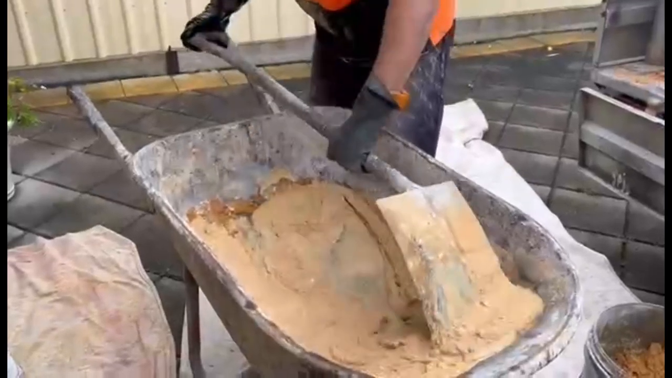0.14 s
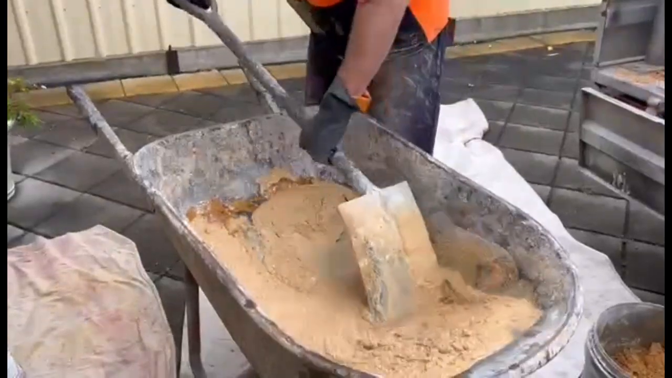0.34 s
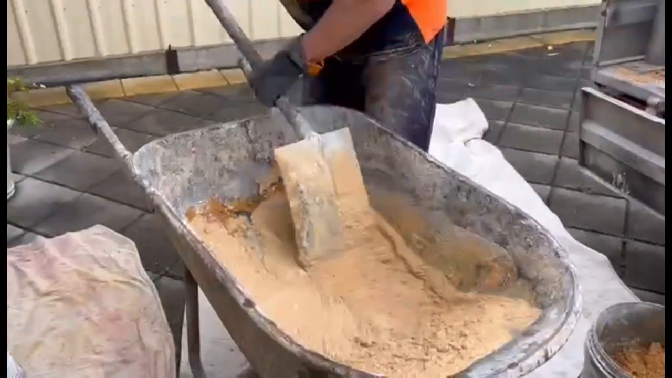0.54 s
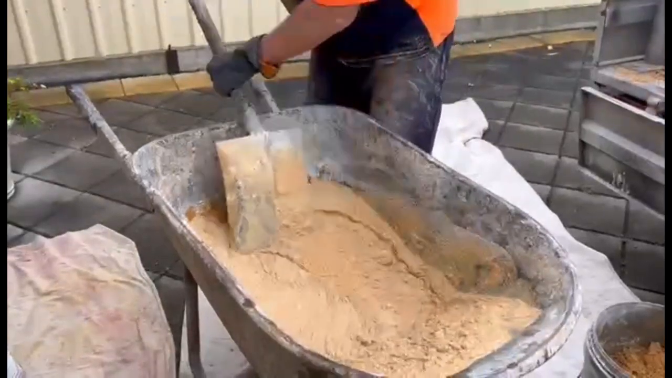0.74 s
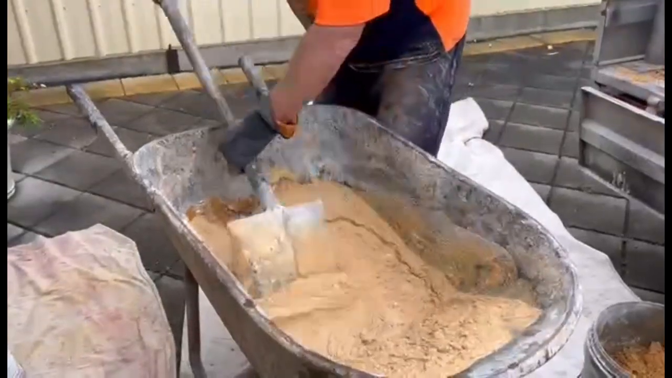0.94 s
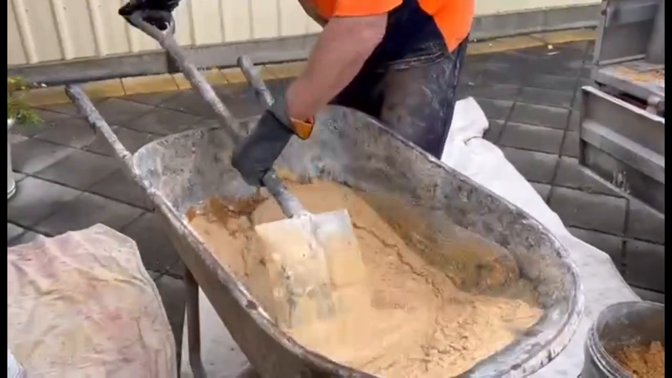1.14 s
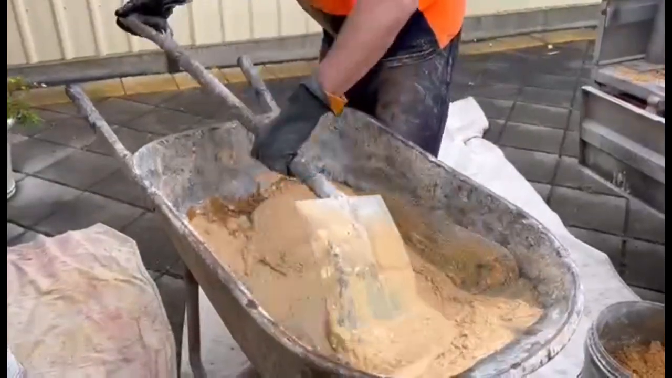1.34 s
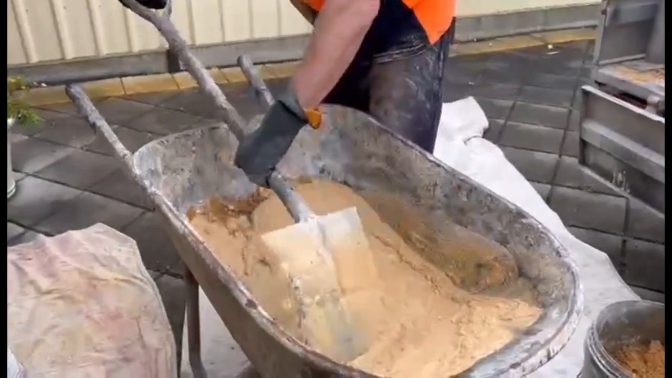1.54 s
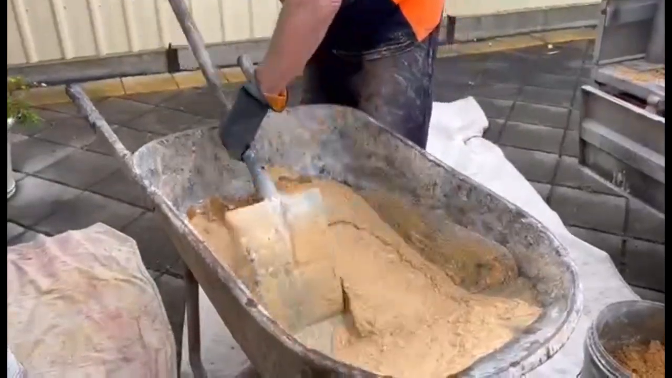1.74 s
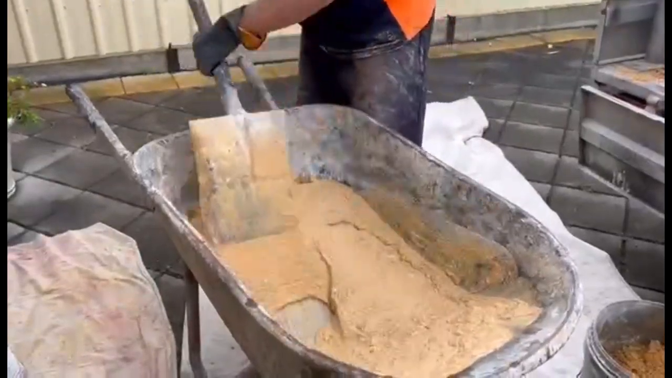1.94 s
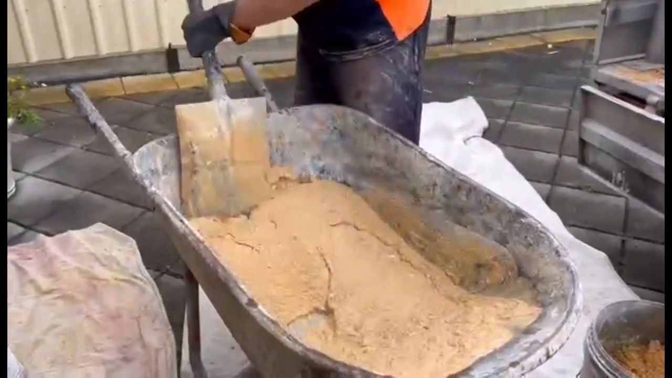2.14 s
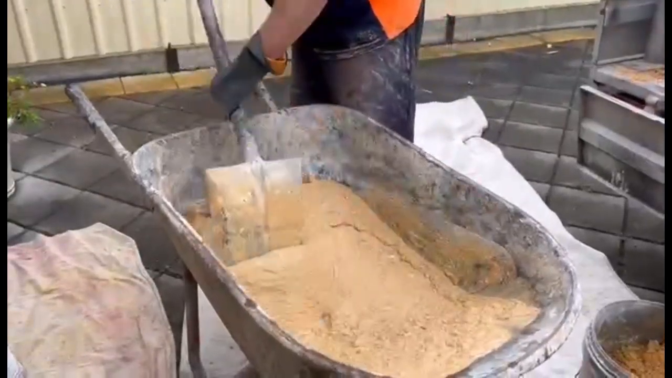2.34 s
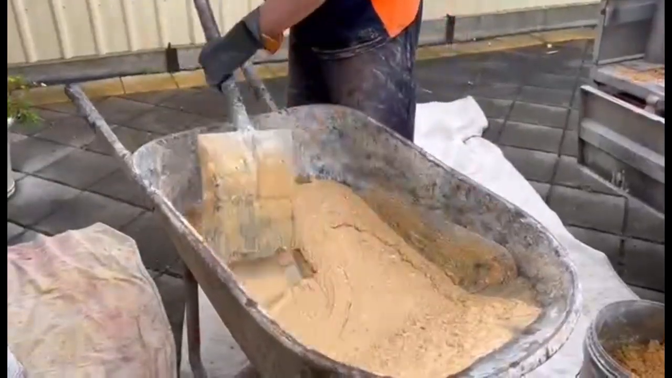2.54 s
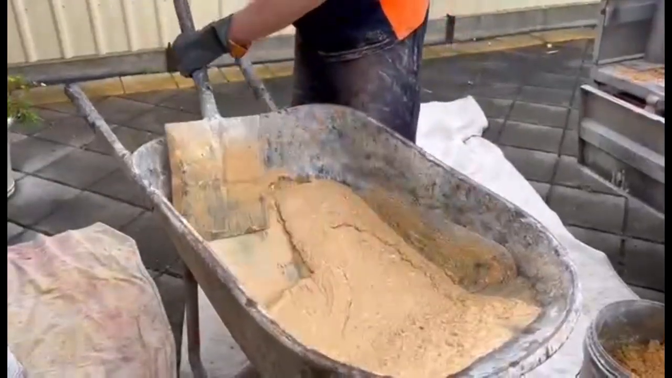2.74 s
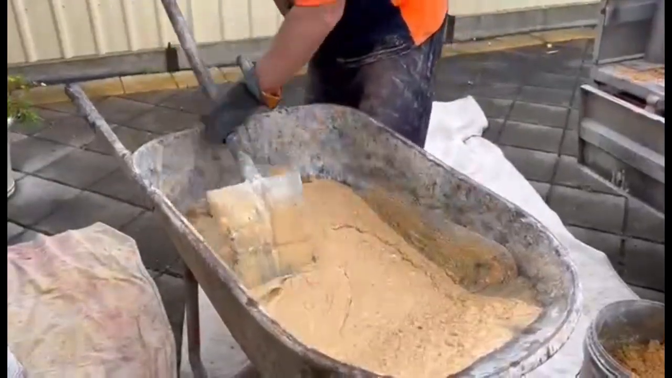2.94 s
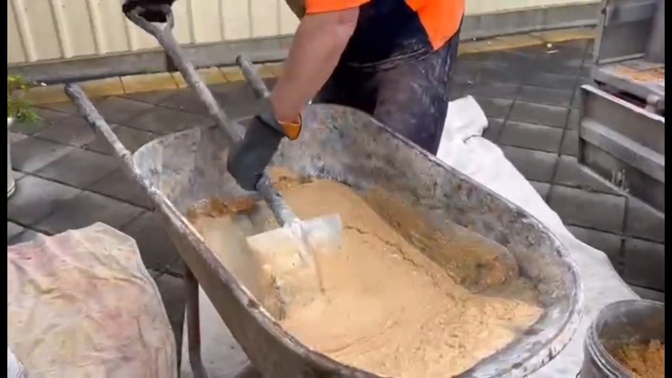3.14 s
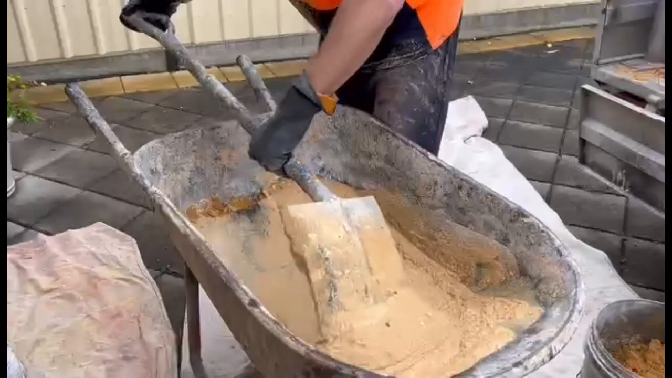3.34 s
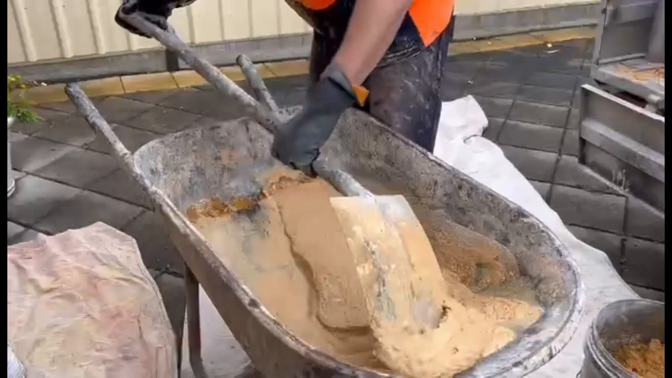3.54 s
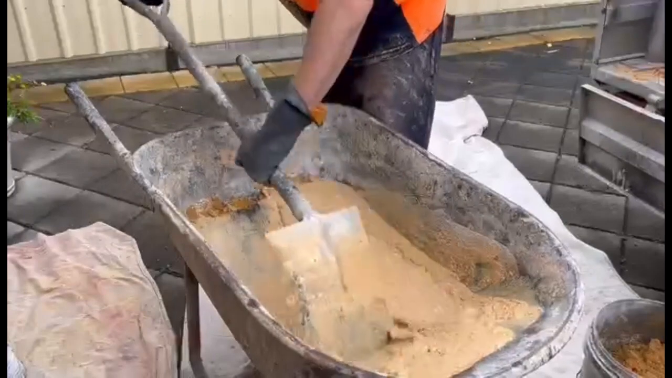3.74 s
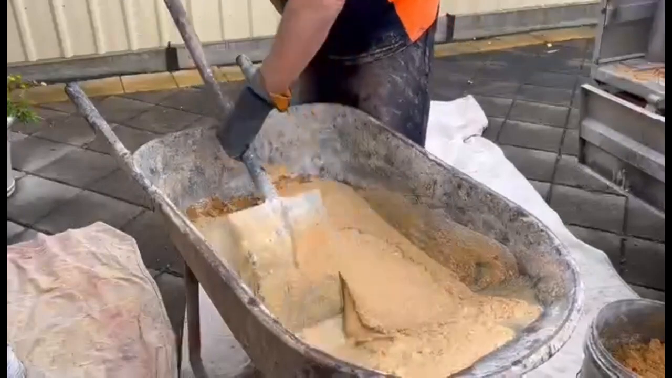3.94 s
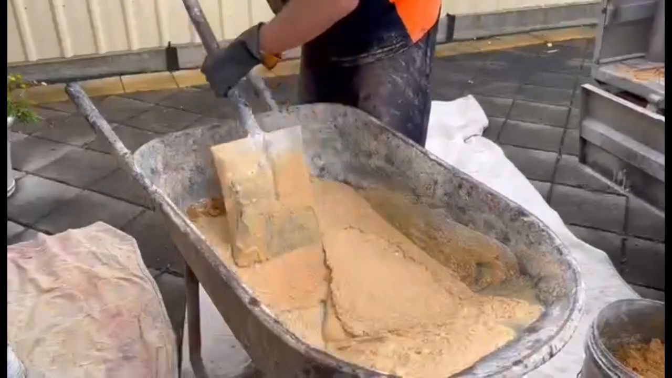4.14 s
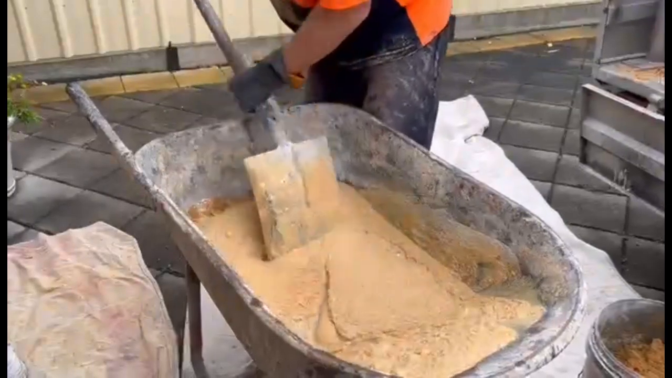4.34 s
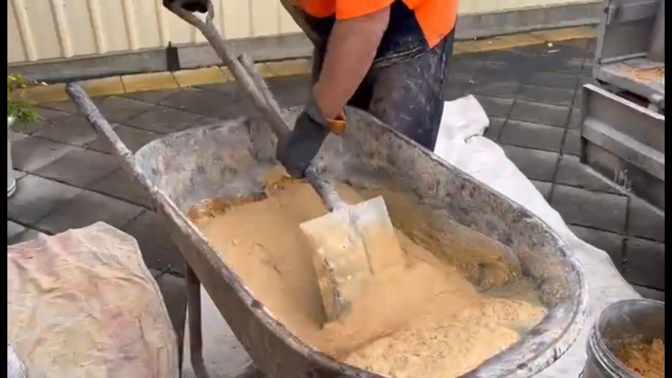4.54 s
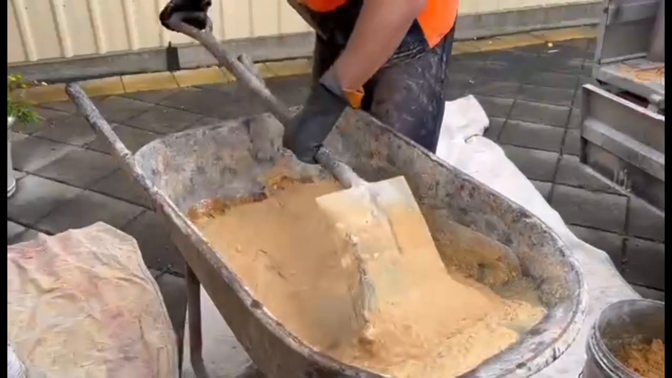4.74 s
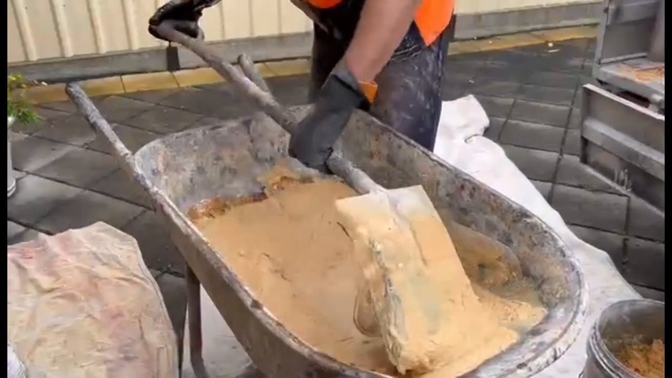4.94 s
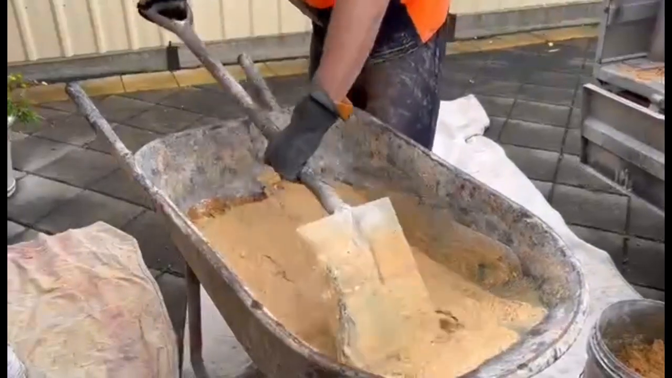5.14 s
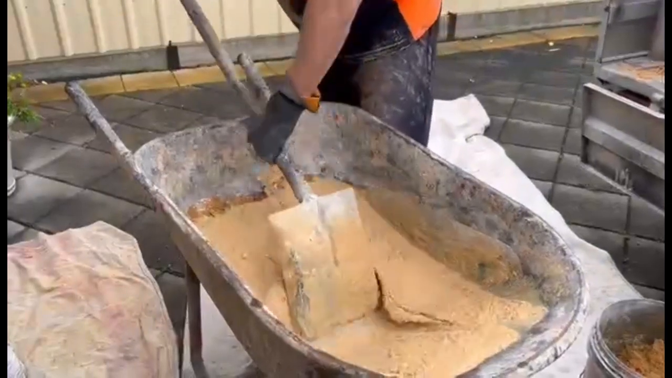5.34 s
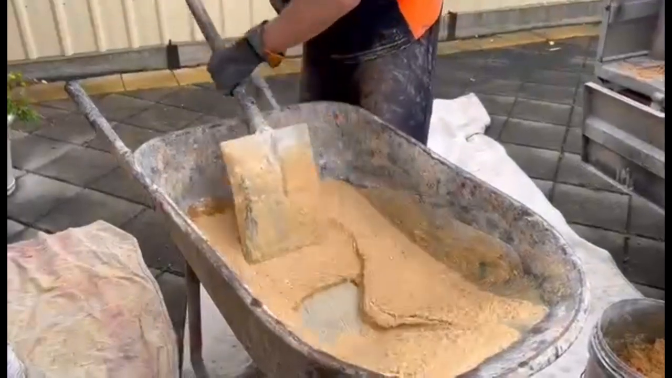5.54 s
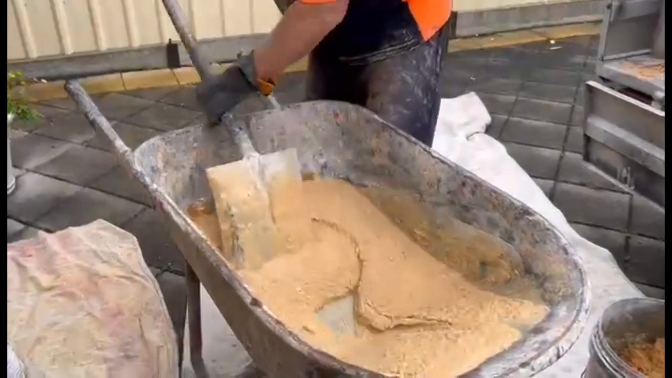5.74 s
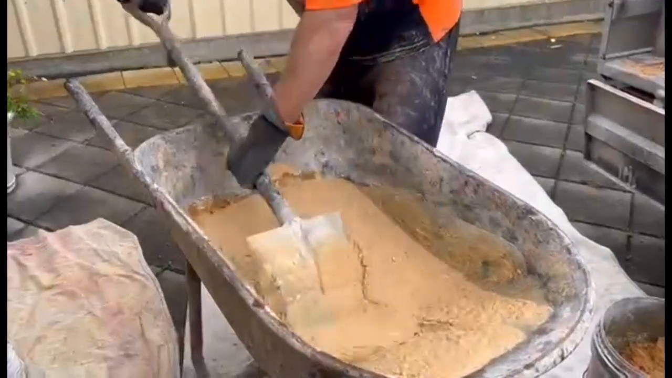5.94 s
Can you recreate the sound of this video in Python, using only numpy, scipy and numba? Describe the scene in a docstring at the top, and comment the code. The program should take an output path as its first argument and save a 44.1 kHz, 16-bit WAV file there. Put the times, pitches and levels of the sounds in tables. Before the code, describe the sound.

Close by in an open yard, a shovel bites into damp sand and rasps along the bottom of a steel wheelbarrow, again and again at a steady working pace with short gaps. The strokes are grainy and uneven, with a short metallic ring and occasional low thuds as blade or falling sand hits the tub. Light wind rumbles softly underneath, along with a smooth far-off town noise.

```python
"""A steel shovel works damp sand mix in a sheet-metal wheelbarrow: nine strokes in 6 s, outdoors.
From 0.17 s on, each stroke starts with a bite: a tick, a crunch of grit, a thud through the blade.
The blade then sticks and slips along the tub; grains under it rasp, hiss and ring blade and tub.
Blade or dropping sand thumps the tub now and then. The last stroke runs to the end.
Under it throughout lie distant town noise and a low rumble from light wind and the strokes."""
import sys
import numpy as np
from scipy import signal
from scipy.fft import rfft, irfft, next_fast_len
from scipy.io import wavfile
from scipy.ndimage import uniform_filter1d
from numba import njit

SR = 44100
rng = np.random.default_rng(int(sys.argv[2]) if len(sys.argv) > 2 else 0)


def wav_record(signal):
    """Record a signal, one row per channel, as 16-bit PCM in the file named by sys.argv[1]."""
    frames = np.transpose(np.atleast_2d(signal))
    bounded = np.clip(frames, -1, 1)
    # unit amplitude maps onto the largest positive 16-bit level
    quanta = np.round(bounded * 32767).astype(np.int16)
    wavfile.write(sys.argv[1], SR, quanta)


N = 264159

# Low tub modes. Each row: frequency in Hz, relative level in dB, t60 in seconds.
TUB_LOW_MODES = [(66.6, -12, 0.2), (98.6, 0.5, 0.35), (130, -7, 0.13), (158.8, -2.5, 0.49),
                 (182.2, 1, 0.29), (214.4, 2.5, 0.058), (258.3, 4.5, 0.16)]
# Sand rasping on steel. Each row: frequency in Hz, relative spectral density in dB.
RASP_SPECTRUM = [(30, -30), (110, -5), (180, 1), (300, -2.5), (508, 1.5), (755, -1), (884, -2.5),
                 (2970, -5.5), (3570, -10), (7000, -17.5), (9100, -17), (15400, -120)]


def shovel():
    """The blade sticks and slips: a slight judder shakes rasp and hiss; tub and blade ring on."""
    # Steel modes. Each row: frequency in Hz, relative level in dB, t60 in seconds.
    blade_modes = [(750, 3.5, 0.067), (857, 3.5, 0.094), (1038, 2.5, 0.035), (1157, -3, 0.053),
                   (1318, 1, 0.046), (1516, 0.5, 0.038), (1660, -3.5, 0.018), (1894, -4, 0.05),
                   (2072, -3, 0.066), (2372, -3, 0.075), (2644, 1.5, 0.036), (2990, 1.5, 0.033),
                   (3728, 5, 0.027), (4430, -0.5, .03)]
    tub_mid_modes = [(247, -6.5, 0.07), (275, 5, 0.051), (320.7, -2, 0.22), (356.6, -2.5, 0.072),
                     (398.5, 0.5, 0.22), (460, 1.5, 0.1), (505.6, 2, 0.075), (542, -1, 0.048),
                     (610, 5.5, 0.094), (703, 3.5, 0.079)]
    # Grit hiss. Each row: frequency in Hz, relative spectral density in dB.
    hiss_spectrum = [(2650, -9.5), (4500, -3), (5840, -8), (9310, -5.5), (10400, -8), (12300, -2.5),
                     (13400, -11), (14900, 3), (16000, -36)]
    (rasp_gain, hiss_gain, ring_gain, boom_gain), (boom_hz, ring_hz, blade_hz) = stroke_controls()
    judder = walk(45)

    def slips():
        return rasp_gain * undb(1.67 * judder + 1.29 * walk(150)) * grains(20000, 0.59)

    def scrape():
        sand = clumps(slips(), patchy_db=4, width_hz=350, hold_s=0.03)
        rasp = fft_filter(sand, lambda hz: undb(at_hz(RASP_SPECTRUM, hz) + 12))
        blade = steel(slips(), blade_modes, blade_hz, width_oct=0.81, patchy_db=4.5)
        return rasp + undb(-1.8) * blade

    def hiss():
        gain = hiss_gain * undb(0.58 * judder + 1.9 * walk(90))
        grit = clumps(grains(16000, 1.1), patchy_db=3.5, width_hz=500, hold_s=0.047)
        return gain * colour(grit, hiss_spectrum)

    def tub_ring():
        drive = ring_gain * undb(4) * grains(5000, 1.6)
        return steel(drive, tub_mid_modes, ring_hz, width_oct=0.58, patchy_db=3.5, detune=0.029)

    def tub_boom():
        drive = boom_gain * undb(1.5) * grains(4000, 2.4)
        return steel(drive, TUB_LOW_MODES, boom_hz, width_oct=0.47, patchy_db=0.5)

    return (stereo(scrape) + stereo(hiss)) * pan(0.64) + stereo(tub_ring) + stereo(tub_boom)


def stroke_controls():
    """Gains (rasp, hiss, ring, boom), zero between pushes, and favoured Hz (boom, ring, blade)."""
    # One curve per push; some strokes push twice.
    # Each point: time in seconds, relative rasp level in dB, hiss offset in dB.
    pushes = [
        [(0.171, -31.5, 12), (0.183, -28.5, -2), (0.225, -27, -5.5), (0.257, -35.5, -1), (0.283, -25, -8),
         (0.341, -28.5, -2), (0.367, -46.5, 0), (0.42, -59, 3)],
        [(0.781, -26, 2), (0.787, -22, -11), (0.809, -26, 3), (0.827, -22.5, -10), (1.027, -17.5, 0),
         (1.089, -27.5, 3.5), (1.133, -28, -7), (1.24, -73.5, 6)],
        [(1.457, -31, 0), (1.491, -40.5, 4.5), (1.523, -29, -3), (1.589, -32, 2), (1.601, -22.5, -7),
         (1.657, -25, -3.5), (1.695, -33.5, -1), (1.714, -36, -1)],
        [(1.717, -32, 14), (1.723, -17.5, 0), (1.755, -22.5, -6), (1.821, -52, 5), (1.86, -55, -6)],
        [(2.157, -24, -2), (2.271, -15, -8), (2.313, -20, -3.5), (2.325, -18, -8), (2.351, -19.5, -6),
         (2.423, -29.5, -5), (2.447, -44, -1), (2.5, -54, -8)],
        [(2.758, -22, 2), (2.766, -19, -13), (2.82, -31.5, -7), (2.834, -29, -6)],
        [(2.837, -22, -2.5), (2.851, -20, -7), (2.939, -16.5, -9), (2.973, -24.5, -2), (3.099, -17, -5.5),
         (3.121, -20, 5.5), (3.247, -33.5, -9.5), (3.35, -80, 3)],
        [(3.617, -29, 3), (3.645, -39, 4), (3.653, -30.5, -0.5), (3.741, -21, -12.5), (3.811, -22, -1),
         (3.863, -21.5, -9), (3.887, -35, -2), (3.9, -27, 3)],
        [(3.903, -31, 8), (3.907, -20.5, 7), (3.955, -22.5, -7.5), (3.973, -31, -3), (3.987, -35, -3),
         (4.011, -48, 1), (4.07, -66, -3)],
        [(4.271, -33, 7.5), (4.357, -25, -10.5), (4.373, -32, -6), (4.391, -23, -1.5), (4.565, -19, -6.5),
         (4.585, -24, 7), (4.639, -27.5, -6.5), (4.72, -60, 2)],
        [(5.033, -31, 8), (5.037, -27.5, 4.5), (5.051, -31, 0), (5.129, -22.5, -5), (5.227, -21, -7.5),
         (5.237, -23.5, -2.5), (5.283, -23.5, -8.5), (5.33, -46.5, 1)],
        [(5.335, -39, 5), (5.349, -26.5, 1), (5.397, -50, 4), (5.44, -64, 4)],
        [(5.678, -30.5, -2), (5.73, -25.5, -11), (5.752, -24, -1), (5.882, -20, -10.5), (5.898, -26.5, -3),
         (5.942, -18.5, 1), (5.966, -29.5, 4), (5.99, -21, -8)],
    ]
    # The steel's answer, by push. Each row: drive offsets from the rasp in dB (ring, boom at start,
    # boom at end), favoured pitches in Hz (boom, ring, blade).
    responses = [(-4, -4.5, 6, 153, 420, 1320), (-4, -15, 10.5, 149, 360, 1800),
                 (-3.5, 5.5, -18, 210, 490, 1140), (-6, -10.5, -4, 200, 510, 1760),
                 (-8.5, -15, 0, 130, 425, 1900), (6, 4, -4, 145, 345, 1100),
                 (-4, -1.5, -4.5, 184, 305, 1500), (-7, -5, -6, 163, 480, 1620),
                 (-5, -4, 10.5, 195, 310, 1220), (-6, -1.5, 1.5, 170, 350, 1560),
                 (-6.5, 3, -7.5, 154, 430, 1350), (-15, -10, -9, 130, 490, 1900),
                 (-4.5, -3, -18, 193, 460, 940)]
    sink_oct_per_s = 0.9  # blade pitch sinks as sand loads it
    roam_db, roam_oct = 2, 0.15
    t = np.arange(N) / SR
    gains, pitches_hz = np.zeros((4, N)), np.ones((3, N))
    for push, (ring_db, boom_start_db, boom_end_db, *favour_hz) in zip(pushes, responses):
        times_s, rasp_db, hiss_db = np.transpose(push)
        on = (t >= times_s[0]) & (t <= times_s[-1])
        db = np.interp(t[on], times_s, rasp_db)
        boom_db = np.linspace(boom_start_db, boom_end_db, on.sum())
        gains[:, on] = undb([db, db + np.interp(t[on], times_s, hiss_db), db + ring_db, db + boom_db])
        pitches_hz[:, t >= times_s[0]] = np.array(favour_hz)[:, None]
        pitches_hz[2, on] *= 2 ** (-sink_oct_per_s * (t[on] - times_s[0]))
    gains[2:] *= undb(roam_db * np.array([walk(14), walk(14)]))
    pitches_hz *= 2 ** (roam_oct * np.array([walk(14) for _ in range(3)]))
    return uniform_filter1d(gains, size=130, axis=1), pitches_hz


def bites():
    """The edge cuts into grit: a sharp tick, a bright crunch, a duller thud through the blade."""
    # Each row: start in seconds, relative crunch and thud levels in dB, t60 in seconds,
    # crunch left minus right in dB.
    edge_hits = [(0.172, -9.5, -38, 0.047, 2), (0.7814, -18.5, -17.5, 0.063, 5),
                 (0.824, -30, -6, 0.034, 0.5), (0.843, -27, -8.5, 0.05, 0.5), (1.457, -23, -18, 0.053, 0),
                 (1.717, -29, -12, 0.021, 2), (2.158, -20.5, -13, 0.054, 0), (2.757, -16, -39, 0.052, 0),
                 (2.8374, -26, -30, 0.054, 5), (3.6173, -22, -16.5, 0.043, -2),
                 (3.6531, -27, -24, 0.046, 1), (3.907, -30, -21.5, 0.053, -6),
                 (4.2713, -15.5, -14, 0.037, 1.0), (5.034, -17, -17, 0.043, -3),
                 (5.0924, -26, -27, 0.038, 0.5), (5.3498, -31, -7, 0.028, -5), (5.677, -22, -24, 0.11, 1),
                 (5.9247, -24, -8, 0.1, -2.5)]
    # Crunching grit. Each row: frequency in Hz, relative spectral density in dB.
    crunch_spectrum = [(1180, -41), (2000, 1), (6300, -16), (8280, 6), (9540, -18), (10800, 6),
                       (14800, -3.5), (16500, -15)]
    attack_s, tick_s = 0.00076, 0.0022
    crunch_gain, thud_gain = np.zeros((2, N)), np.zeros(N)
    for start_s, crunch_db, thud_db, t60_s, pan_db in edge_hits:
        start = int(start_s * SR)
        t = np.arange(min(int(0.12 * SR), N - start)) / SR
        envelope = np.minimum(t / attack_s, 1) * undb(-60 * t / t60_s)
        tick = 1 + 1.1 * np.exp(-t / tick_s)
        span = slice(start, start + len(t))
        crunch_gain[:, span] += undb(crunch_db - 4) * pan(pan_db) * envelope * tick
        thud_gain[span] += undb(thud_db - 8) * envelope
    crunch = crunch_gain * stereo(lambda: colour(grains(12000, 3.1), crunch_spectrum))
    thud = stereo(lambda: thud_gain * colour(grains(9000, 1.7), RASP_SPECTRUM))
    return crunch + thud


def thumps():
    """Soft blows of a few ms from blade or dropping sand excite the low tub modes."""
    # Each row: start in seconds, relative level in dB, favoured pitch in Hz.
    blows = [(0.2, -21, 72.7), (0.3, -18, 185), (1.049, -10.5, 232), (1.461, -17, 149), (2.185, -4.5, 110),
             (2.564, -21, 61.5), (2.752, -6, 181), (2.842, -5, 177), (3.622, -19, 172), (3.94, -13.5, 184),
             (4.638, -11.5, 135), (4.692, -12, 74), (4.759, -18, 88), (4.79, -24, 171), (4.817, -35, 107),
             (5.047, -18.5, 168), (5.2, -11, 178)]
    force, favour_hz = np.zeros(N), np.full(N, 150.)
    for start_s, db, hz in blows:
        start = int(start_s * SR)
        pulse = np.hanning(int(SR / hz / 2) + 2)
        force[start:start + len(pulse)] += undb(db + 28.5) * pulse / pulse.sum()
        favour_hz[start:] = hz
    return steel(force, TUB_LOW_MODES, favour_hz, width_oct=0.34, patchy_db=5.5)


def grains(per_s, spread_db, cap_db=8):
    """Single sand grains slip: random clicks of unequal size, unit RMS."""
    hits = (rng.random(N) < per_s / SR) * rng.standard_normal(N)
    size_db = np.minimum(spread_db * rng.exponential(1, N), cap_db)
    return unit_rms(hits * undb(size_db))


def clumps(x, patchy_db, width_hz, hold_s):
    """Clumps of unlike grain size: patches of pitch and time swell and sink on their own."""
    frame, hop = 256, 128
    _, _, spectra = signal.stft(x, SR, nperseg=frame)
    patches = rng.standard_normal(spectra.shape)
    patches = uniform_filter1d(patches, size=max(int(width_hz * frame / SR), 1), axis=0)
    patches = uniform_filter1d(patches, size=max(int(hold_s * SR / hop), 1), axis=1)
    gain = unit_rms(undb(patchy_db * unit_rms(patches)))
    return signal.istft(spectra * gain, SR, nperseg=frame)[1][:N]


def steel(x, modes, favour_hz, width_oct, patchy_db, detune=0.025):
    """Panel modes, driven hardest near favour_hz; shifting sand varies their coupling and tuning."""
    total, power = 0, 0
    for k, (hz, db, t60_s) in enumerate(modes):
        radius = np.exp(-np.log(1000) / (t60_s * SR))
        nearness = np.exp(-0.5 * (np.log2(hz / favour_hz) / width_oct) ** 2)
        drive = x * nearness * undb(db + patchy_db * walk(24)) + 1e-18
        ringing = mode(drive, hz * (1 + detune * walk(12)), radius)
        total = total + (-1) ** k * np.sqrt(4 * (1 - radius)) * ringing
        power += undb(db) ** 2
    # little sounds below the lowest mode
    low_cut = signal.butter(4, 0.7 * modes[0][0], "high", fs=SR, output="sos")
    return signal.sosfilt(low_cut, total) / np.sqrt(power)


@njit
def mode(x, hz, radius):
    """One damped mode with moving pitch."""
    y, state, pole = np.empty(len(x)), 0j, 0j
    for i in range(len(x)):
        if i % 64 == 0:
            pole = radius * np.exp(2j * np.pi * hz[i] / SR)
        state = state * pole + x[i]
        y[i] = state.imag
    return y


def yard(x, t60_s=1.0, wet_db=-33):
    """Adds a faint diffuse return from paving and a nearby wall."""
    t = np.arange(int(0.6 * SR)) / SR
    tail = rng.standard_normal((2, len(t))) * undb(-60 * t / t60_s) * (t > 0.008)
    tail /= np.sqrt(np.sum(tail ** 2, axis=1, keepdims=True))
    return x + undb(wet_db) * signal.fftconvolve(x, tail, axes=1)[:, :N]


def low_rumble():
    """Low rumble from light wind and the shovel strokes, with a flutter a little higher."""
    # Each row: time in seconds, level in dB.
    rumble_levels = [(0.0, -52), (0.18, -43), (0.78, -54.5), (0.85, -43), (1.43, -48), (1.48, -34.5),
                     (2.05, -57), (2.24, -39), (2.29, -49), (2.7, -48), (2.77, -44), (3.32, -49),
                     (4.24, -47.5), (4.39, -27), (4.52, -52), (4.62, -31), (5.6, -49.5), (5.99, -36.5)]
    db = np.interp(np.arange(N) / SR, *np.transpose(rumble_levels)) + 2 * walk(8.3)
    rumble = stereo_noise([(18, -32), (30, -7), (45, 8), (65, 8), (95, 10.5), (160, -37), (400, -88)])
    flutter = stereo_noise([(40, -62), (80, -32), (130, -6), (260, -17.5), (450, -36), (1200, -90)])
    return undb(db + 0.83 * walk(26.3)) * rumble + undb(db - 10 + 3.4 * walk(28)) * flutter


def town(base_db=-54.5):
    """Smooth distant noise, drifting in level."""
    # Each row: frequency in Hz, relative spectral density in dB.
    spectrum = [(15, -56), (25, -14), (70, -4), (285, -16), (560, -17.5), (607, -16.5), (1070, -22),
                (1520, -26.5), (2480, -29.5), (2910, -28.5), (3250, -31), (14000, -35.5), (16000, -21.5)]
    # Each row: time in seconds, level over base in dB.
    swell = [(0, 7), (.77, 7), (1.5, 6.5), (2.75, 3), (3.4, 6), (4.4, 5.5), (5.03, 7.5), (5.99, 4)]
    swell_db = np.interp(np.arange(N) / SR, *np.transpose(swell))
    return undb(base_db + swell_db) * stereo_noise(spectrum)


def stereo(make):
    """Two draws of make() become mid and side of a left-right pair."""
    # Sound common to both microphones. Each row: frequency in Hz, share from 0 to 1.
    coherence = [(60, 0.81), (200, 0.96), (600, 0.49), (1500, 0.6), (4000, 0.6), (8000, 0.49),
                 (15000, 0.25)]
    mid = fft_filter(make(), lambda hz: np.sqrt((1 + at_hz(coherence, hz)) / 2))
    side = fft_filter(make(), lambda hz: np.sqrt((1 - at_hz(coherence, hz)) / 2))
    return np.array([mid + side, mid - side])


def stereo_noise(spectrum):
    """Noise pair with a (Hz, dB) spectrum."""
    return stereo(lambda: colour(rng.standard_normal(N), spectrum))


def colour(x, spectrum):
    """Filter by (Hz, dB) points, then scale to unit RMS."""
    return unit_rms(fft_filter(x, lambda hz: undb(at_hz(spectrum, hz))))


def fft_filter(x, gain_at):
    size = next_fast_len(N)
    hz = np.maximum(np.arange(size // 2 + 1) * SR / size, 1.)
    return irfft(rfft(x, size) * gain_at(hz), size)[..., :N]


def at_hz(points, hz):
    """Read (Hz, value) points on a log-frequency axis."""
    points_hz, values = np.transpose(points)
    return np.interp(np.log(hz), np.log(points_hz), values)


def walk(rate_hz):
    """Random steps, smoothed twice; spread near 1."""
    hold = int(SR / rate_hz)
    steps = np.repeat(rng.standard_normal(N // hold + 1), hold)
    return 1.31 * uniform_filter1d(uniform_filter1d(steps, hold), hold)[:N]


def pan(left_minus_right_db):
    return undb(np.array([[0.5], [-0.5]]) * left_minus_right_db)


def undb(db):
    return 10 ** (np.asarray(db) / 20)


def unit_rms(x):
    return x / np.sqrt(np.mean(x ** 2))


def scene():
    return yard(shovel() + bites() + thumps()) + low_rumble() + town()


def record(dry):
    """The phone drops deep bass, rounds loud peaks, falls away above its band and cuts the very top."""
    bass_cut = signal.butter(2, 42, "high", fs=SR, output="sos")
    mic_band = signal.ellip(8, 0.3, 28, 15480, fs=SR, output="sos")
    top_cut = signal.ellip(10, 0.2, 70, 16645, fs=SR, output="sos")
    rounded = np.tanh(signal.sosfilt(bass_cut, dry))
    return signal.sosfilt(top_cut, signal.sosfilt(mic_band, rounded))


dry = scene()
out = record(dry)
wav_record(out)
```